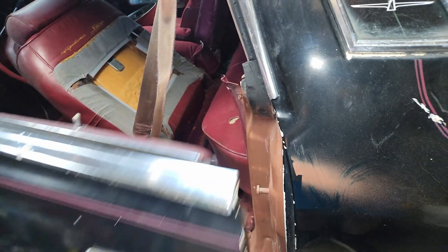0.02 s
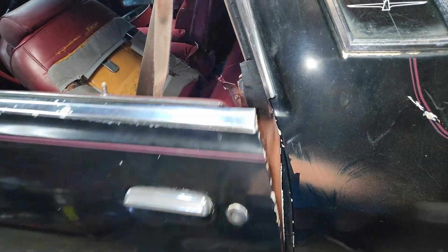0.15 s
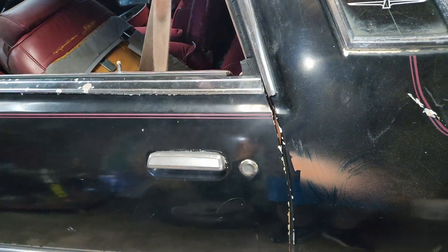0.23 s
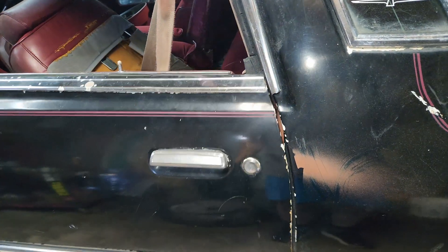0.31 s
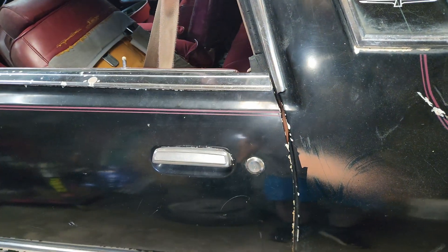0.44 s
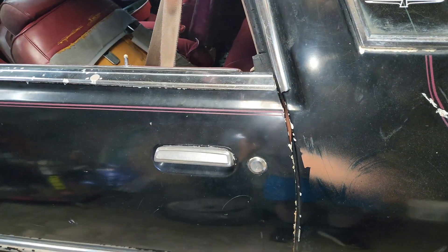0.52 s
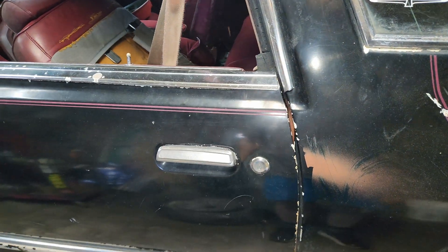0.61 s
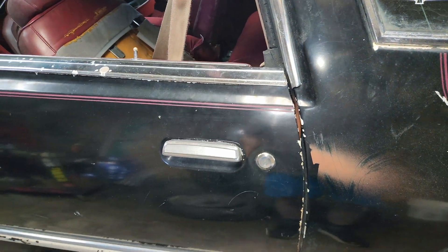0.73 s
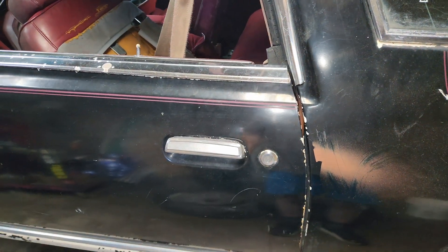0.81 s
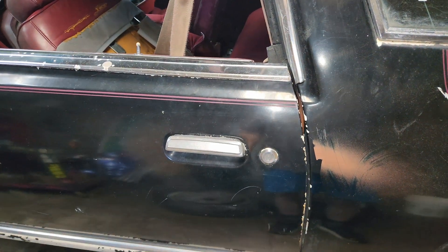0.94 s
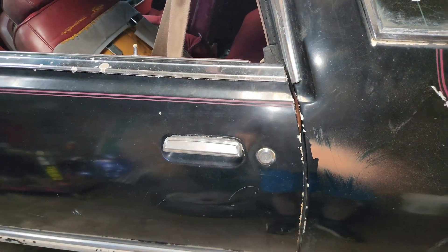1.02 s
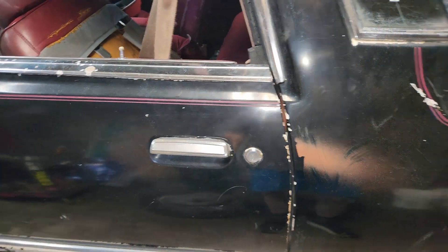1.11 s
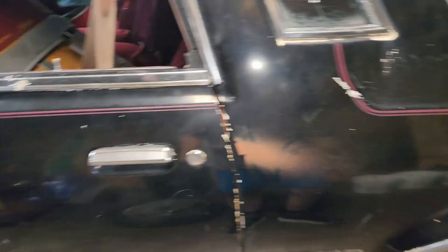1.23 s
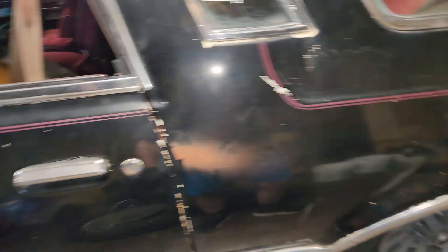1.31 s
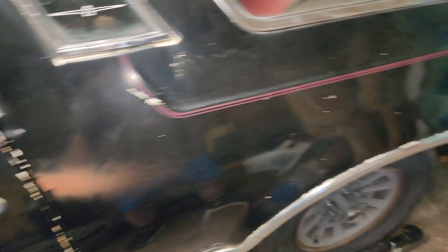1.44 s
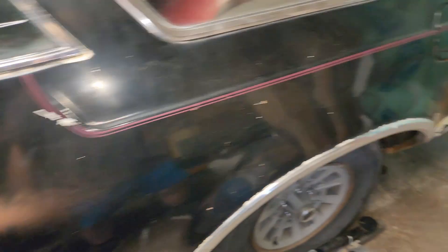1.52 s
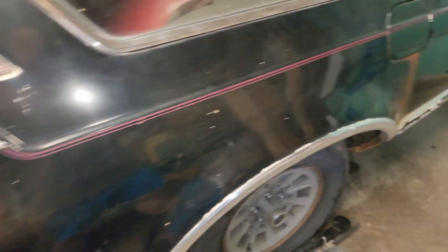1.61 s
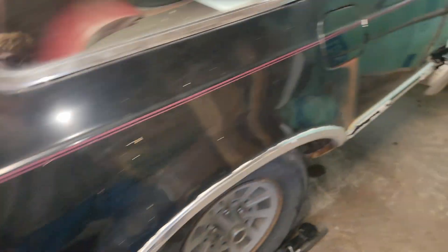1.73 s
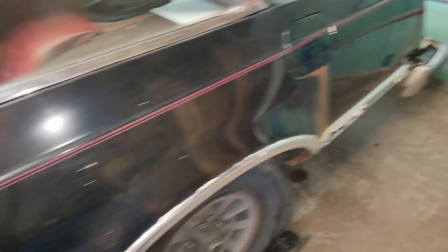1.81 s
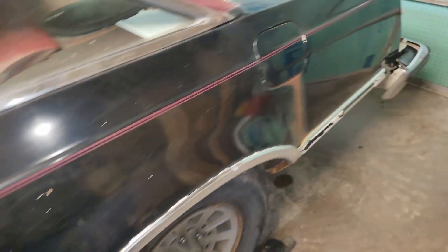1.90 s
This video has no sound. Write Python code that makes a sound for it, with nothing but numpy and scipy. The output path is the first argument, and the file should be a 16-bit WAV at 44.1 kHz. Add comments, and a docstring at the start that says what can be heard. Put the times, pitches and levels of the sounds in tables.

```python
"""In a roofed parking bay, a heavy old car door slams close by, over a low, steady rumble.
The door swings with a soft rush, its steel latch clashes through the catches and knocks on the
striker, the peg that holds it shut. The door lands on its seals with a boom and shudders, and loose
parts clunk inside it. Roof and walls echo the slam; a few faint shoe scuffs follow."""
import sys
import numpy as np
from scipy import signal
from scipy.fft import rfft, irfft, next_fast_len
from scipy.io import wavfile
from scipy.ndimage import map_coordinates

SR = 44100
rng = np.random.default_rng(int(sys.argv[2]) if len(sys.argv) > 2 else 0)


def wav_record(signal):
    """Record a signal, one row per channel, as 16-bit PCM in the file named by sys.argv[1]."""
    frames = np.transpose(np.atleast_2d(signal))
    bounded = np.clip(frames, -1, 1)
    # unit amplitude maps onto the largest positive 16-bit level
    quanta = np.round(bounded * 32767).astype(np.int16)
    wavfile.write(sys.argv[1], SR, quanta)


N = 88200
TIME = np.arange(N) / SR


def amp(db):
    """Turn decibels into a number to multiply by."""
    return 10 ** (np.asarray(db) / 20)


def pan(db):
    """Left and right gains that make the left side louder by db."""
    return amp([[db / 2], [-db / 2]])


def at(start_s, sound):
    """Delay a sound so that it begins at start_s."""
    return np.pad(sound, [(0, 0)] * (sound.ndim - 1) + [(round(start_s * SR), 0)])[..., :N]


def curve(rows, hz):
    """Read between a table's (frequency, value) rows, with octaves evenly spaced."""
    row_hz, values = np.transpose(rows)
    return np.interp(np.log(hz + 1), np.log(row_hz + 1), values)


def filtered(sound, gain_at):
    """Turn each frequency up or down by gain_at(hz)."""
    size = next_fast_len(N + SR // 2)
    hz = np.fft.rfftfreq(size, 1 / SR)
    return irfft(rfft(sound, size) * gain_at(hz), size)[..., :N]


def fade(fade_s, rise_s):
    """Rise quickly, then die away. The fade time is how long a drop of 60 dB takes."""
    return np.exp(-np.log(1000) * TIME / fade_s) * (1 - np.exp(-TIME / rise_s))


def ring(tones, rise_s, scatter_db):
    """The fading tones of a struck object, each a little louder or softer at every blow."""
    return sum(amp(db + scatter_db * rng.normal()) * np.sin(2 * np.pi * hz * TIME) * fade(fade_s, rise_s)
               for hz, db, fade_s in tones)


# How alike left and right are. Each row: frequency in Hz, likeness (1 same, 0 unrelated, -1 opposite).
STEREO_LIKENESS = [(60, 0.99), (150, .96), (300, .86), (600, .76), (1300, 0.25), (2800, -0.047),
                   (4500, -0.002), (14000, -0.55)]

def noise(colour, tilt_db=0):
    """Stereo noise of strength 1. Colour sets its lows and highs; tilt_db per octave brightens it."""
    def gain_at(hz):
        width = np.arccos(np.clip(curve(STEREO_LIKENESS, hz), -1, 1)) / 2
        level_db = curve(colour, hz) + tilt_db * np.log2(1 + hz / 500)
        return amp(level_db) * [np.cos(width), np.sin(width)]
    middle, side = filtered(rng.standard_normal((2, N)), gain_at)
    stereo = np.array([middle + side, middle - side])
    return stereo / np.sqrt(np.mean(stereo ** 2) + 1e-20)


# The rumble's colour. Each row: frequency in Hz, relative level in dB.
RUMBLE_COLOUR = [(12, -36.5), (20, -5), (74, -2), (120, -7.5), (142, -24), (234, -15), (357, -20.5),
                 (399, -15.5), (446, -24.5), (738, -25), (1330, -32), (2910, -33.5), (3950, -47),
                 (7730, -50), (16000, -69.5)]

def rumble(level_db=-49.5, waver_db=0.5, wavers_per_s=6):
    """A low outdoor rumble that wavers slightly."""
    waver = map_coordinates(rng.standard_normal(64), [TIME * wavers_per_s], mode="wrap")
    return amp(level_db + waver_db * waver) * noise(RUMBLE_COLOUR)


# The swinging door's colour. Each row: frequency in Hz, relative level in dB.
SWING_COLOUR = [(30, -4.5), (70, 1.5), (250, -1), (450, -6), (800, -10.5), (1600, -14.5), (3000, -19.5),
                (4000, -31), (7500, -31), (10000, -46), (16000, -54)]

def door_swing(level_db=-50.5, end_s=.21, release_s=.02):
    """A soft rush while the door is moving; it stops as the door lands."""
    return amp(level_db) * noise(SWING_COLOUR) * np.exp(-np.maximum(TIME - end_s, 0) / release_s)


# Metal hits of the latch and door edge. Each row: start in seconds, level in dB,
# brightness in dB per octave, left minus right in dB.
LATCH_HITS = [(0.2048, -30.5, -0.5, -7), (.2100, -8.5, -1.5, 2.5), (.2128, -5.5, 1.5, -1),
              (.2205, -14, -1, 3.5), (.2290, -6, -1, 0), (.2360, -12.5, 3, 1.5), (.2400, -12, 1.5, 6),
              (.2700, -21, -1.5, -1.5), (.2780, -21, 1, 1), (.3605, -26, -3.5, -1.5), (.643, -58, -8, -2),
              (.727, -60.5, -5, -3)]
# The crash's colour. Each row: frequency in Hz, relative level in dB.
CRASH_COLOUR = [(100, -16), (300, -7.5), (620, -4.5), (800, -1.5), (950, -3.5), (1350, 1.5), (2800, -4),
                (3400, -14), (4200, -6), (5700, -3.5), (7600, -5), (8800, -11), (12000, -12),
                (15500, -12.5)]
# The ringing steel. Each row: pitch in Hz, relative level in dB, fade time in seconds.
STEEL_TONES = [(779, 5.5, 0.2), (1580, -2.5, .18), (1685.4, -2, .17), (1943, -6, .2), (2250, -4.5, 0.26),
               (4467, -10.5, 0.15), (5560, -7, .14), (5760, -2.5, .09), (6700, -4, .09), (7440, 1, 0.18)]
# How the latch's sound shifts between left and right from band to band. Each row: frequency in Hz, left minus
# right in dB.
LATCH_BALANCE = [(250, 3.5), (740, 1.5), (1220, -1.5), (2000, -2.5), (3300, 5), (5500, -3), (9000, 0),
                 (15000, 3)]

def latch(steel_db=-24.5, rise_s=.0004):
    """Each time steel hits steel, a bright crash leaves the latch ringing."""
    hits = np.zeros((2, N))
    for start_s, db, tilt_db, pan_db in LATCH_HITS:
        crash = noise(CRASH_COLOUR, tilt_db) * fade(0.048, rise_s)
        steel = np.array([ring(STEEL_TONES, rise_s, scatter_db=4) for side in range(2)])
        hits += at(start_s, amp(db) * pan(pan_db) * (crash + amp(steel_db) * steel))
    return filtered(body_echoes(hits), lambda hz: amp(curve(LATCH_BALANCE, hz) * [[.5], [-.5]]))


def body_echoes(sound, count=6, strength=.33, longest_s=.005, side_lag_s=.00014):
    """Add quick bounces off the car's own panels; each reaches left and right slightly apart."""
    paths = rng.uniform([.0006, -1, -1], [longest_s, 1, 1], (count, 3))
    heard = []
    for channel, side in zip(sound, (1, -1)):
        bounces = sum(np.sign(flip) * at(abs(delay_s + side * direction * side_lag_s), channel)
                      for delay_s, flip, direction in paths)
        heard.append(channel + strength * bounces)
    return np.array(heard) / np.sqrt(1 + count * strength ** 2)


# The striker takes the door's weight. Each row: start in seconds, level in dB.
STRIKER_KNOCKS = [(0.2123, -18), (.2205, -6.5)]
# The tones of a knock. Each row: pitch in Hz, relative level in dB, fade time in seconds.
STRIKER_TONES = [(370.2, -1, 0.045), (420.7, -2.5, .06), (190, -8, .08)]

def striker():
    """Short, hollow knocks as the latch meets the peg on the door frame."""
    return pan(3) * sum(at(start_s, amp(db) * ring(STRIKER_TONES, rise_s=.001, scatter_db=0.5))
                        for start_s, db in STRIKER_KNOCKS)


# The door lands on its seals and shudders. Each row: start in seconds, level in dB.
DOOR_THUMPS = [(0.2397, -8), (.2860, -14.5), (.3080, -15), (.3230, -18), (.3500, -14.5), (.3850, -13.5)]
# The door's metal skin. Each row: pitch in Hz, relative level in dB, fade time in seconds.
SKIN_TONES = [(63, -1, 0.14), (79.7, -7.5, .3), (100, -9, 0.6), (112.66, -12, 0.6), (135.6, -14.5, .3),
              (167.1, -11, .15), (229.5, -11.5, 0.22)]
# The colour of the seals' puff. Each row: frequency in Hz, relative level in dB.
PUFF_COLOUR = [(20, -17.5), (60, -1.5), (200, -2.5), (450, -8.5), (700, -13.5), (2000, -40), (8000, -65.5)]

def door_boom(puff_db=-2, rise_s=.003):
    """Soft, heavy blows: the door's skin booms and the seals give a dull puff."""
    thumps = np.zeros((2, N))
    for start_s, db in DOOR_THUMPS:
        boom = ring(SKIN_TONES, rise_s, scatter_db=2.5)
        puff = amp(puff_db) * noise(PUFF_COLOUR) * fade(.07, rise_s)
        thumps += at(start_s, amp(db) * (boom + puff))
    return thumps


# Clunks inside the door. Each row: start in seconds, level in dB.
LOOSE_CLUNKS = [(.2855, -11.5), (.2905, -21), (.3080, -21), (.3300, -29.5), (.3640, -30.5)]
# A clunk's colour. Each row: frequency in Hz, relative level in dB.
CLUNK_COLOUR = [(80, -10), (300, -3.5), (600, -1), (950, -12), (1250, -9.5), (2000, -16.5), (5000, -29.5),
                (15000, -48)]
# The ringing parts. Each row: pitch in Hz, relative level in dB, fade time in seconds.
LOOSE_TONES = [(395.8, -3.5, 0.38), (484, -9.5, 0.37), (555.2, -0.5, 0.17), (790, -2, .1),
               (1133, 8.5, 0.063), (1291, -5.5, .07)]

def loose_parts(ring_db=-10.5, rise_s=0.00056):
    """The lowered window and the arms that lift it clunk inside the door."""
    clunks = np.zeros((2, N))
    for start_s, db in LOOSE_CLUNKS:
        thud = noise(CLUNK_COLOUR) * fade(0.077, rise_s)
        ringing = amp(ring_db) * ring(LOOSE_TONES, rise_s, scatter_db=1)
        clunks += at(start_s, amp(db) * (thud + ringing))
    return clunks


# How long the echo lasts. Each row: frequency in Hz, fade time in seconds.
ECHO_FADES = [(60, 0.92), (170, 1.05), (350, 0.66), (800, 0.58), (2000, 0.55), (5500, 0.49), (9000, .39),
              (15000, .32)]
# How loud the echo is. Each row: frequency in Hz, level next to the direct sound in dB.
ECHO_LEVELS = [(30, -9.5), (70, -7), (130, -3), (250, -2), (450, -3.5), (850, -5.5), (1400, -5.5),
               (2500, -4.5), (6000, -8.5), (14000, -6.5)]

def bay_echo(sound, delay_s=.006, build_s=0.0042):
    """Sound bounces between roof and walls; the bass lasts longest."""
    hiss = noise([(20, 0), (20000, 0)])  # equally strong at all frequencies
    hz, t, bands = signal.stft(hiss, SR, nperseg=512)
    decay = np.exp(-np.log(1000) * t / curve(ECHO_FADES, hz)[:, None])
    shape = decay * (1 - np.exp(-t / build_s))
    shape /= np.sqrt(N * np.mean(shape ** 2, axis=1, keepdims=True))  # same energy in every band
    levels = amp(curve(ECHO_LEVELS, hz))[:, None]
    tail = signal.istft(bands * shape * levels, SR, nperseg=512)[1]  # the echo of one click
    echo = signal.fftconvolve(sound, tail, axes=1)[:, :N]
    return pan(-1) * at(delay_s, echo)


# Shoe scuffs. Each row: middle in seconds, half length in seconds, level in dB,
# brightness in dB per octave, squeak level next to the brushing in dB.
SHOE_SCUFFS = [(1.144, 0.027, -57, -2, 0), (1.573, 0.035, -60.5, 1, -16), (1.839, .025, -64, -4, -14.5)]
# The colours of the brushing and the squeak. Each row: frequency in Hz, relative level in dB.
BRUSH_COLOUR = [(200, -21), (900, -5.5), (2200, -3.5), (3600, -11), (7000, -11), (9000, -14), (15000, -31)]
SQUEAK_COLOUR = [(400, -37), (1250, -10.5), (1550, -4.5), (1950, -15.5), (5000, -36)]

def shoe_scuffs():
    """Soles brush the concrete in short swells, with a slight rubbery squeak."""
    scuffs = np.zeros((2, N))
    for middle_s, half_s, db, tilt_db, squeak_db in SHOE_SCUFFS:
        brush = noise(BRUSH_COLOUR, tilt_db)
        squeak = amp(squeak_db) * noise(SQUEAK_COLOUR)
        swell = np.exp(-.5 * ((TIME - middle_s) / half_s) ** 2)
        scuffs += amp(db) * (brush + squeak) * swell
    return scuffs


def scene():
    """The swing, the slam with its echo and the scuffs, all over the rumble."""
    slam = latch() + striker() + door_boom() + loose_parts()
    return door_swing() + slam + bay_echo(slam) + shoe_scuffs() + rumble()


def record(dry, top_hz=16000):
    """Round off the tallest peaks and cut away the treble above top_hz."""
    rounded = dry / (1 + np.abs(dry) ** 6) ** (1 / 6)
    return filtered(rounded, lambda hz: 1 / np.sqrt(1 + (hz / top_hz) ** 160))


dry = scene()
out = record(dry)
wav_record(out)
```